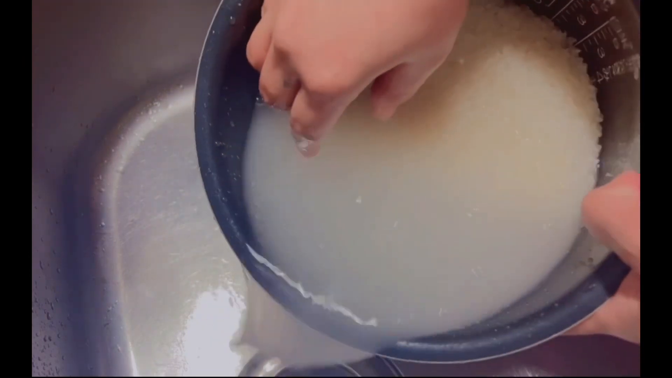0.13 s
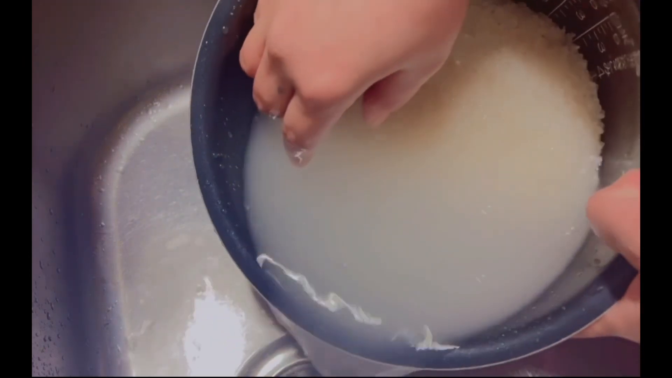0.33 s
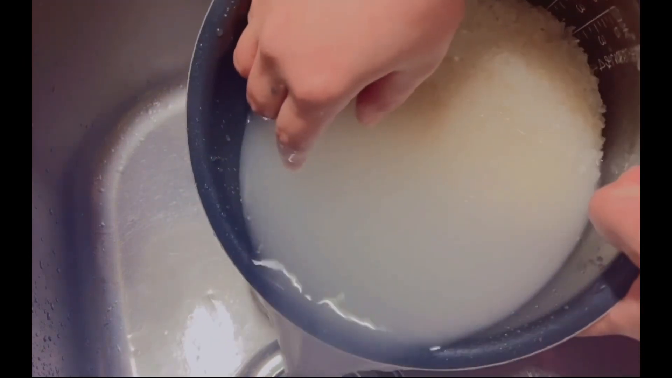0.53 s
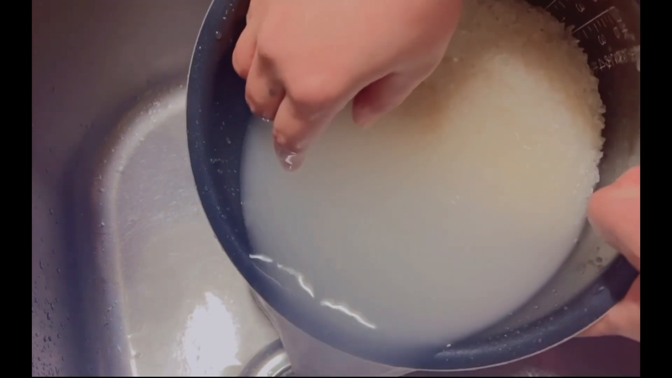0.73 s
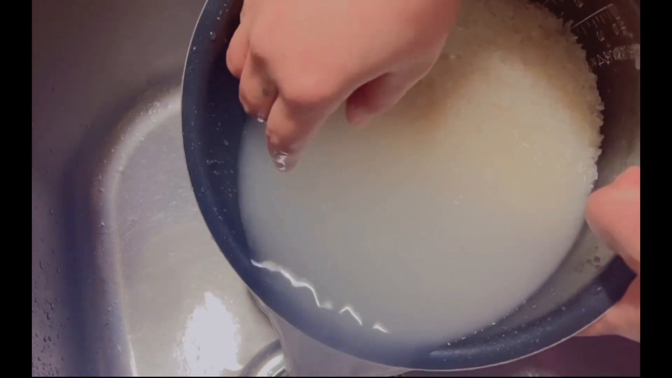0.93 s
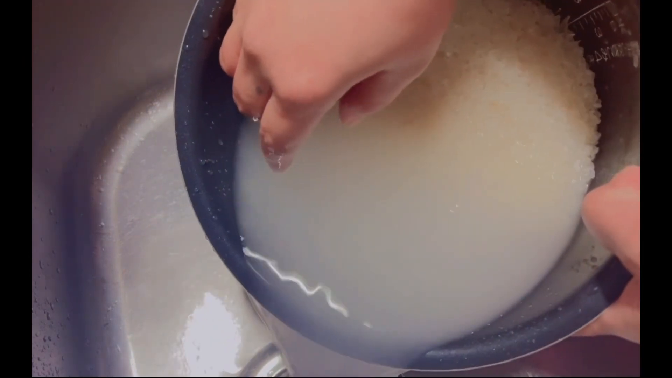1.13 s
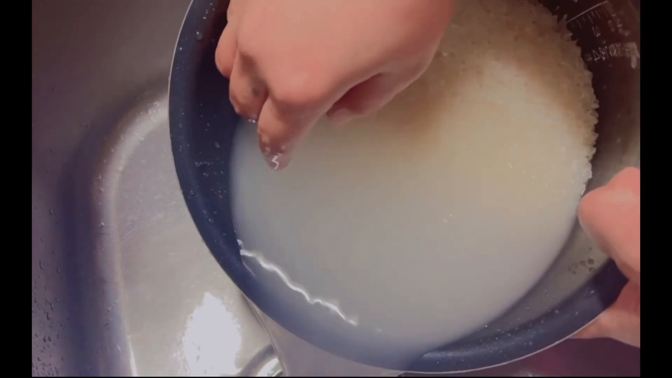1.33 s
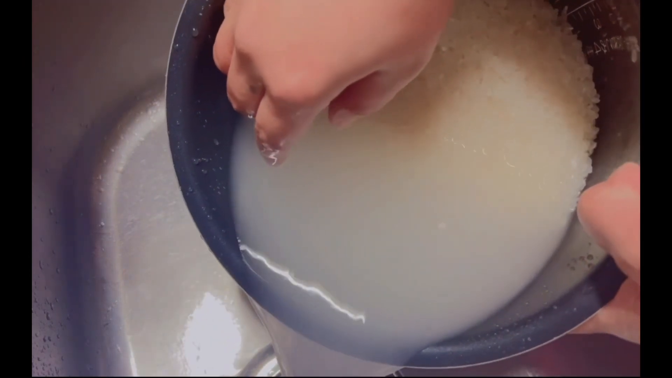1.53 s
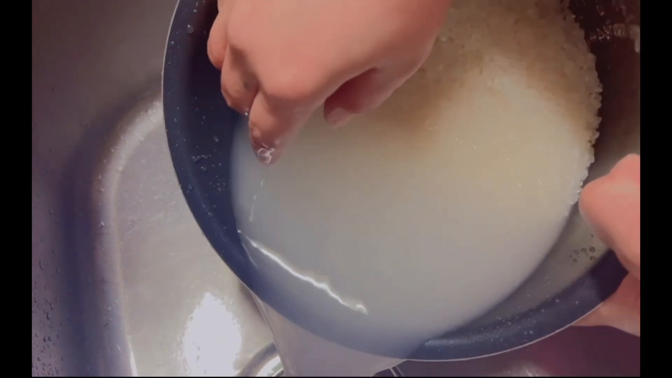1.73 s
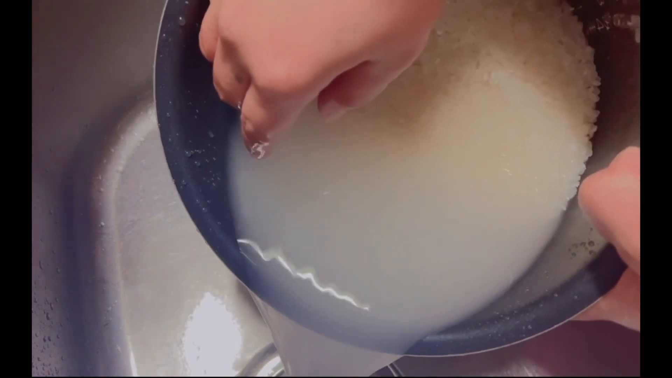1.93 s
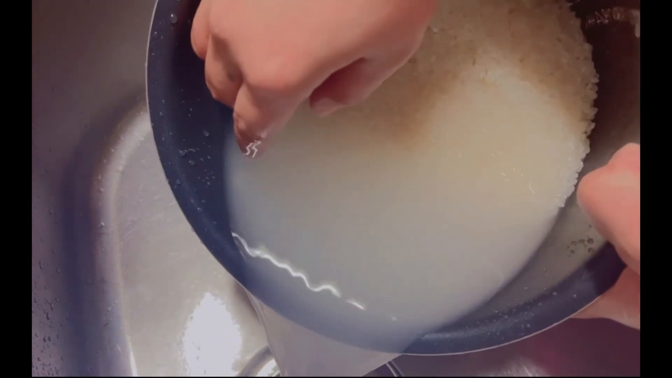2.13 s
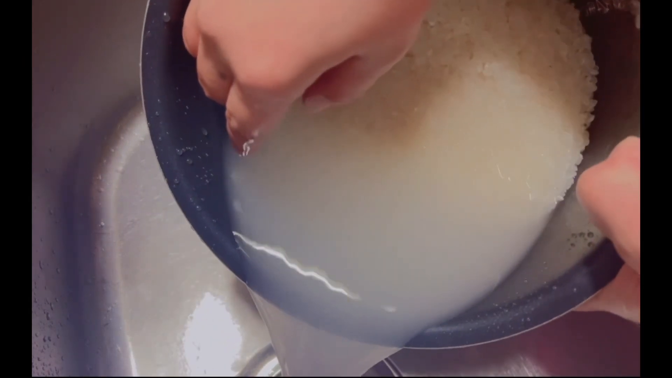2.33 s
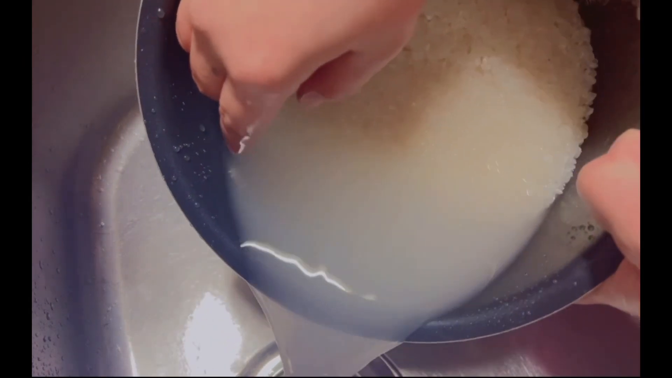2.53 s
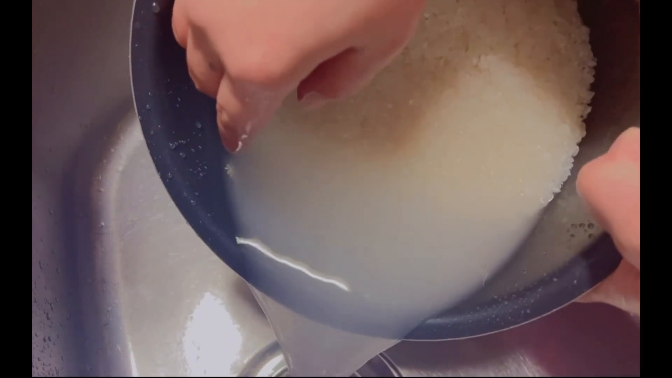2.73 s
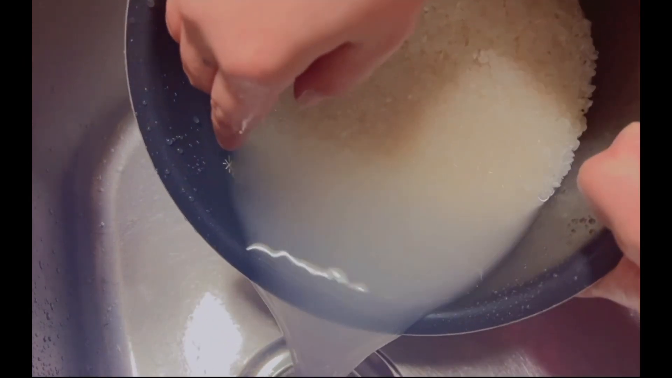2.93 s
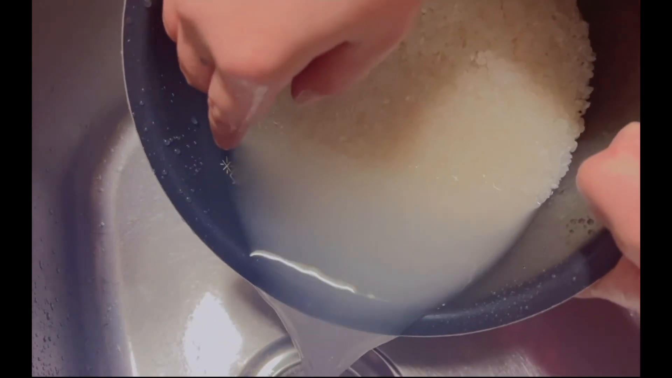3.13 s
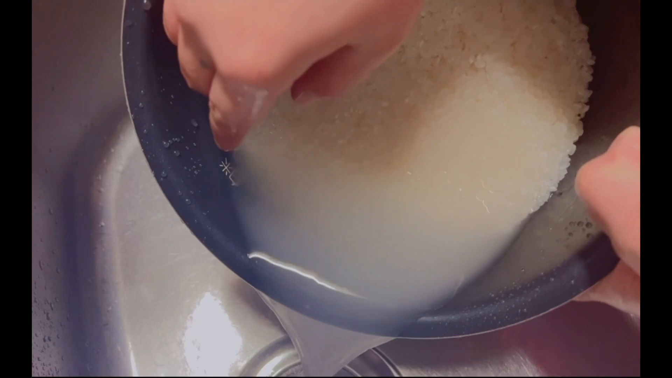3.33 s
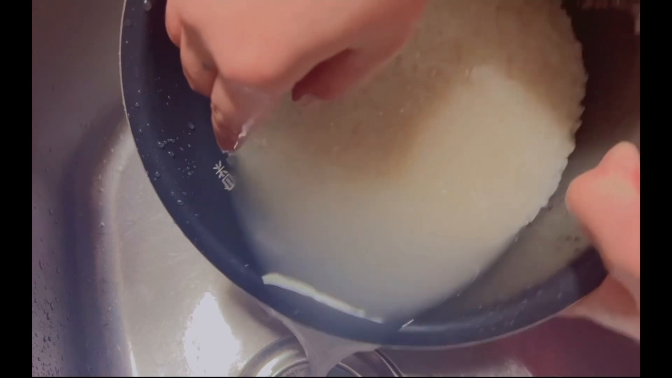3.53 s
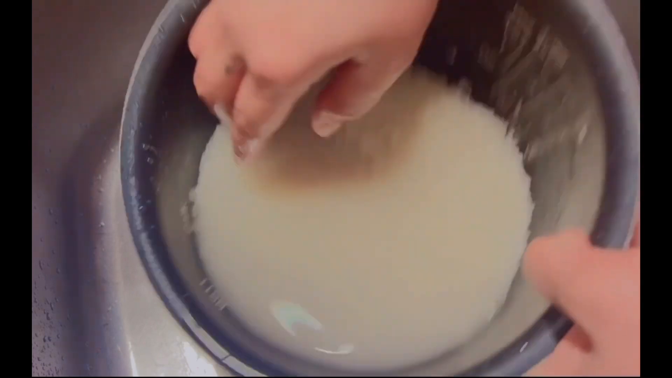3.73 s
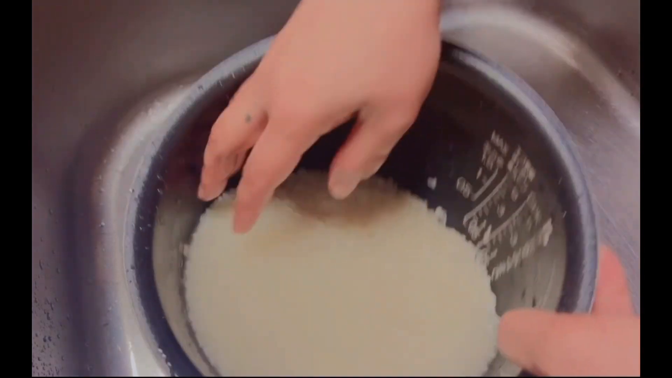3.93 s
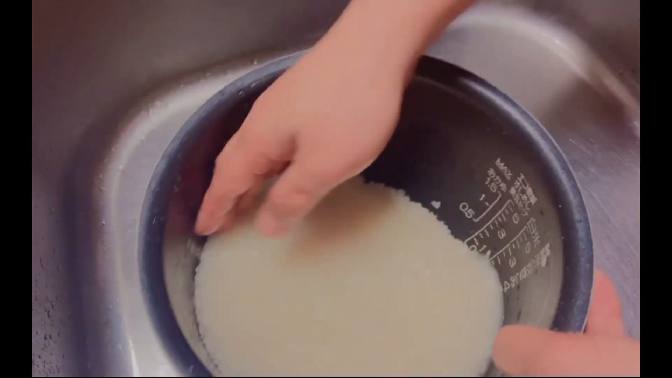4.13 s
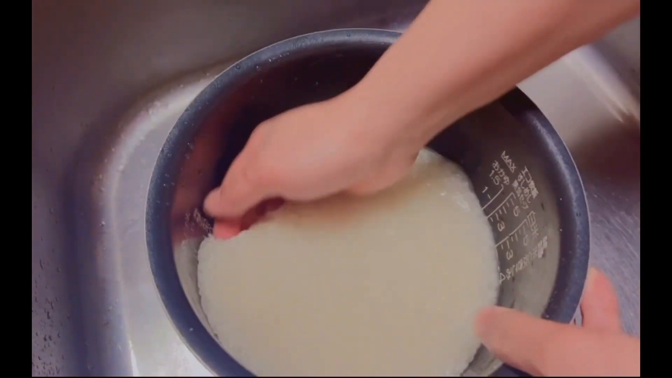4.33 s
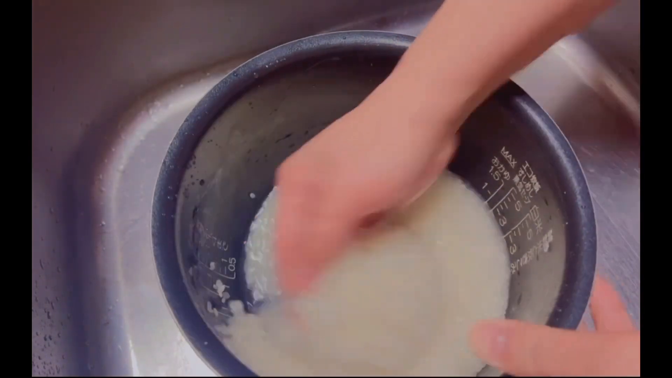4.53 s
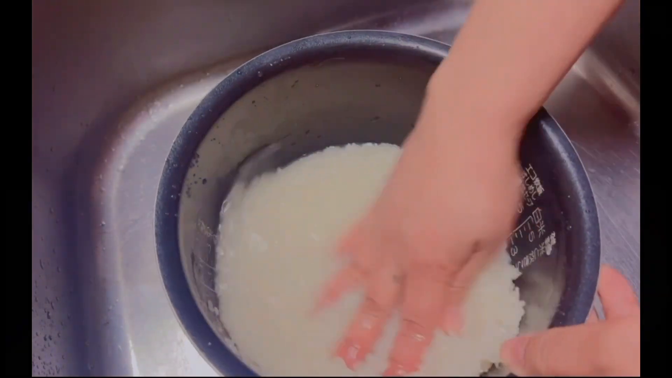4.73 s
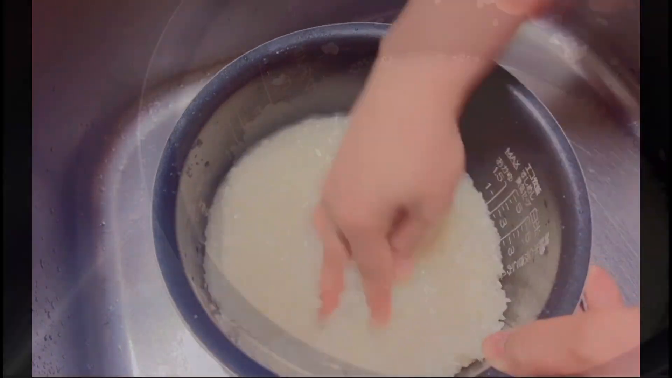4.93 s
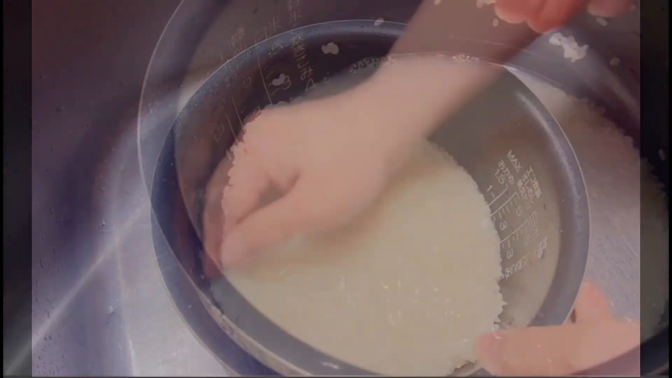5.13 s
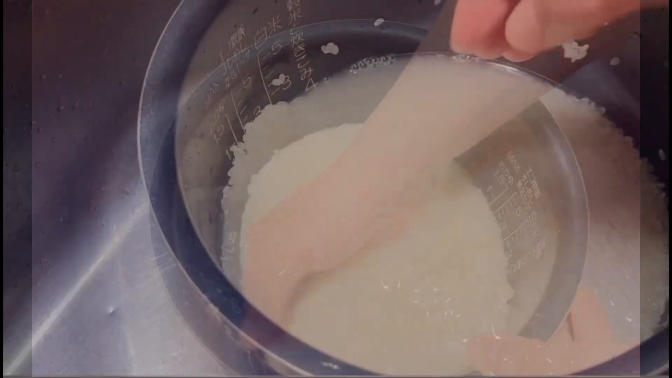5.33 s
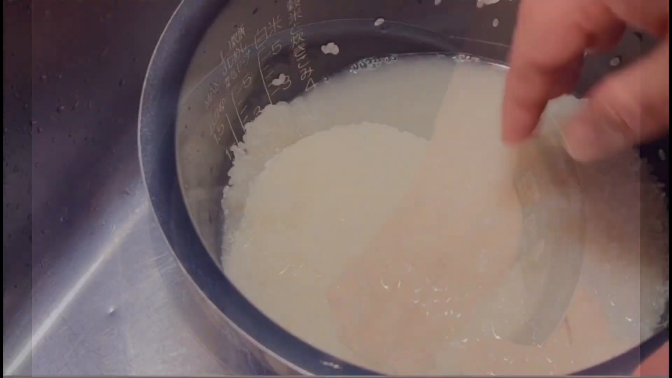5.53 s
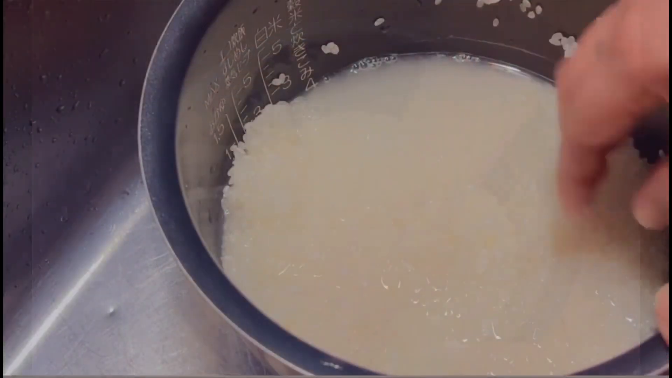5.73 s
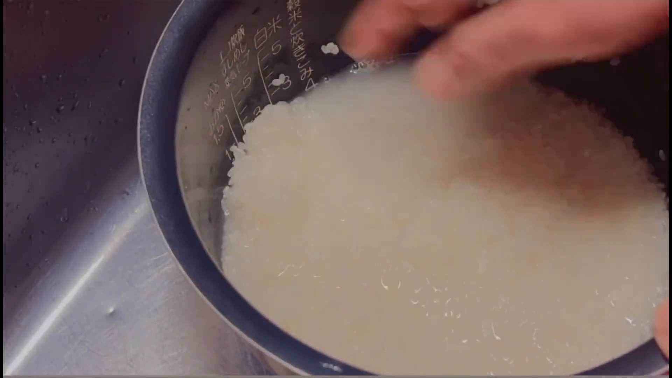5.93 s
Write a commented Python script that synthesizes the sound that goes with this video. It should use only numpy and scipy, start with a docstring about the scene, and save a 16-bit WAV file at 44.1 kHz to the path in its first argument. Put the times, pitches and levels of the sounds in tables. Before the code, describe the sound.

An uneven stream of water patters and glugs onto thin steel, full of bubbles and splashing droplets, for almost four seconds. A single heavy pot knock dominates, with a deep boom and short metallic chatter. Then soft wet grains rasp under quick hand strokes, the pot judders dully on the basin, and small clear taps follow. Close microphone, faint room echo.

```python
"""Pouring off rice water and stirring the rice

Cloudy rice water runs from a pot into a steel sink: random clicks strike basin tones for the drumming,
and short dying tones make the gurgles, bubbles and spatter. The pot lands with one heavy knock and rocks
to rest, as noise and struck steel tones. Then a hand stirs the wet rice, which rasps as filtered clicks
and bubbles, and fingers tap the pot. Close microphone, small kitchen with a faint echo."""
import sys
import numpy as np
from scipy import signal
from scipy.io import wavfile
from scipy.ndimage import uniform_filter1d

SR = 44100
rng = np.random.default_rng(int(sys.argv[2]) if len(sys.argv) > 2 else 0)


def materialize(psi):
    """Save the field psi as 16-bit PCM at rate SR to the path in sys.argv[1].

    A 1-D psi becomes a single channel; in a 2-D psi each row is a channel.
    """
    bounded = np.clip(np.atleast_2d(psi).T, -1, 1)
    quanta = np.round(bounded * 32767).astype(np.int16)
    wavfile.write(sys.argv[1], SR, quanta)


N = 268128
TIME = np.arange(N) / SR  # seconds

# slugs of water that land on the basin: start_s, level_db, pitch_hz (the strongest)
SLUGS = [(0.177, -43.5, 220.5), (0.421, -32.5, 171), (0.567, -26.5, 183), (0.626, -20, 117.6),
         (0.778, -25.5, 120), (1.008, -22.5, 137.5), (1.164, -26, 105.6), (1.223, -24.5, 113),
         (1.509, -20.5, 112.5), (1.608, -25.5, 117), (1.783, -16.5, 120.3), (1.86, -24, 200),
         (1.917, -25.5, 116), (2.126, -29, 153), (2.247, -21, 99.7), (2.342, -18.5, 115.3),
         (2.613, -23, 127.5), (2.774, -21, 120), (2.862, -24, 131), (3.078, -23.5, 98.5), (3.134, -27, 226),
         (3.19, -21, 115), (3.278, -18.5, 129.8), (3.572, -22, 121.2), (3.697, -27.5, 128)]
# tones of the struck basin, before any extra damping: pitch_hz, level_db, time_to_fall_60_db_s
SINK = [(64.6, -8, .16), (103, -11, .2), (128, 0, .185), (187, -10, .26), (229, -18, .32), (255, -24, .2),
        (367, -33, .3), (392, -32, .3), (495, -29, .3), (535, -32, .25), (578, -32, .3), (733, -35, .35),
        (893, -28, .4)]
DRUM_DB, DRUM_GROWTH = -40, 0.97  # level at a flow of 0 dB; dB per dB of flow
SWING_RISE_S, SWING_FALL_S = 0.0025, 0.046  # the basin floor under a slug


def drumming():
    """The stream patters on the sheet steel; slugs of water thump it and the floor swings a few times."""
    tap = ring(SINK, centre_hz=300, octaves=0.58, rise_s=0.0035)
    patter = unit(through(clicks(per_s=400, spread_db=3.5), tap))
    steady = amp(DRUM_DB) * stream() ** DRUM_GROWTH
    slug_patter = amp(-14.5) * surges(SLUGS, rise_s=0.0021, fall_s=0.048)
    out = np.hypot(steady, slug_patter) * patter
    t = TIME[:SR // 4]
    swing = (1 - np.exp(-(t / SWING_RISE_S) ** 2)) * np.exp(-t / SWING_FALL_S)
    for s, db, hz in SLUGS:
        add(out, s, peaked(swing * np.sin(2 * np.pi * hz * t), db - 6.0))
    return out


# the stream, as the pot is tipped and righted: time_s, flow_db
FLOW = [(0.171, -30), (0.181, -13.5), (0.33, -15), (0.39, -6), (0.53, -9.5), (0.57, -1.5), (0.72, -6.5),
        (1.04, 0), (1.2, -6), (1.36, -2.5), (1.7, 0.5), (2.2, -1.5), (2.57, 2), (2.9, -4.5), (3.27, -4.5),
        (3.45, -5.5), (3.55, -6), (3.86, -12.5), (3.93, -18.5), (4.0, -16.5)]
GATHER_S, GATHER_DB = 0.15, 0.5  # span and depth of the change before each slug


def stream():
    """Strength of the steady stream, which swells slightly while each slug gathers."""
    gathering = np.zeros(N)
    for s, _, _ in SLUGS:
        add(gathering, s - GATHER_S, np.sin(np.linspace(0, np.pi / 2, int(GATHER_S * SR))))
    smooth = uniform_filter1d(np.minimum(gathering, 1), size=300)
    return level(FLOW, 1) * amp(GATHER_DB * smooth)


# tone colour of the water: frequency_hz, level_db (per Hz)
WATER = [(250, 14), (295, -7.5), (372, 7.5), (432, -6), (485, 5), (590, -13), (735, -7), (890, -5.5),
         (1200, -16), (1650, -12), (2250, -15.5), (3300, -20), (6400, -22), (7200, -27), (8200, -24),
         (11500, -26.5), (15700, -19.5)]
# air resonances between basin and pot: pitch_hz, width_hz, height_db
BASIN_AIR = [(398, 20, 1.5), (497, 25, 2), (731, 20, 7), (759, 18, 5), (893, 25, 7), (985, 25, 3),
             (1071, 25, 5), (1130, 30, 3), (1215, 40, 5), (1355, 45, 5), (1612, 45, 7), (1735, 45, 4),
             (1880, 150, 3), (2380, 180, 4), (3750, 200, 3), (4140, 90, 6), (4520, 180, 5), (6680, 140, 6),
             (8000, 350, 3), (8950, 200, 4)]
# air churned under the stream, against the flow: time_s, level_db
CHURN = [(0.2, -9.5), (0.7, -11), (1.1, -6.5), (1.4, -1), (1.62, -5.5), (1.8, -4), (2.05, -2.5),
         (2.27, -4.5), (2.38, 0.5), (2.65, -6.5), (2.9, -5), (3.2, -4), (3.5, -4.5), (3.9, 6)]
# large pockets of trapped air: start_s, peak_db, pitch_hz (at the start), ring_s
GULPS = [(0.407, -34, 616, 0.013), (0.42, -28.5, 890, 0.0074), (0.436, -30.5, 734, 0.012),
         (0.57, -33.5, 670, 0.011), (0.583, -34, 860, 0.006), (0.777, -36, 480, 0.0087),
         (0.797, -38.5, 893, 0.0084), (1.012, -26, 484, 0.011), (1.157, -34, 360, 0.016),
         (1.159, -34, 893, 0.011), (1.205, -39, 910, 0.0068), (1.248, -39, 892, 0.018),
         (1.362, -37, 366, 0.021), (1.368, -41, 720, .009), (1.505, -37, 448, 0.013),
         (1.602, -38, 400, 0.008), (1.767, -27, 366, 0.011), (1.769, -29.5, 752, 0.014),
         (1.778, -44, 866, .007), (1.798, -35, 388, 0.016), (1.802, -36, 1070, 0.013),
         (1.83, -36, 887, 0.013), (1.95, -37, 904, 0.01), (2.012, -36, 750, .011),
         (2.013, -33, 503, 0.0097), (2.133, -37, 386, 0.0049), (2.343, -32, 714, 0.0089),
         (2.37, -42, 740, .012), (2.46, -32, 492, 0.008), (2.472, -31, 374, 0.011), (2.684, -34, 472, 0.01),
         (2.719, -29.5, 765, 0.0052), (2.809, -35.5, 875, 0.0081), (2.811, -24, 411, 0.006),
         (2.98, -32.5, 447, 0.0064), (3.183, -28, 414, 0.0041), (3.196, -35, 885, 0.016),
         (3.278, -31, 398, 0.0024), (3.33, -40, 910, 0.0087), (3.358, -28.5, 528, 0.017),
         (3.378, -41, 785, 0.0062), (3.382, -27.5, 377, 0.01), (3.69, -34, 370, 0.0036)]
GURGLE_DB, GURGLE_GROWTH = -41.5, 1.0  # level at flow and churn of 0 dB; dB per dB of flow


def gurgle():
    """Air churned under the stream rings in the basin; every gulp breaks up into a cloud of large bubbles."""
    swarm = scattered(lambda: froth(260.6, 1446, cycles=2.7, spread_db=2.5, count=2000),
                      t60=0.12, wall_db=-3, count=2)
    swarm = unit(colour(hollow(swarm, BASIN_AIR), WATER))
    steady = amp(GURGLE_DB) * level(CHURN, 1) * stream() ** GURGLE_GROWTH
    cloud = scattered(lambda: froth(246.7, 930, cycles=5.1, spread_db=1.0, count=1200),
                      t60=0.07, wall_db=-2, count=1)
    cloud = unit(band(hollow(cloud, BASIN_AIR), 250, 1200, order=4))
    churned = steady * lumps(top_hz=13.2, depth_db=1.5) * swarm
    return churned + amp(-14.0) * surges(GULPS, rise_s=0.0023, fall_s=0.022) * cloud


BURBLE_DB = -43  # at flow and churn of 0 dB


def burble():
    """Middling bubbles crowd the pool under the stream and plop one over another."""
    plops = scattered(lambda: froth(620, 2300, cycles=6, spread_db=2.6, count=700),
                      t60=.07, wall_db=-6, count=2)
    plops = unit(colour(hollow(plops, BASIN_AIR), WATER))
    return amp(BURBLE_DB) * level(CHURN, 1) * level(FLOW, 1) * plops


SPATTER_DB = -44  # strength of the hiss at a flow of 0 dB


def spatter():
    """Bursting bubbles, tiny fizz and droplet ticks come in clumps as the stream breaks up."""
    clumps = lumps(top_hz=45, depth_db=2.4)
    pops = scattered(lambda: clumps * froth(1357, 2790, cycles=5.5, spread_db=3.5, count=400),
                     t60=0.06, wall_db=-4, count=2)
    fizz = scattered(lambda: clumps * froth(2317, 12500, cycles=11, spread_db=3.4, count=2800),
                     t60=0.055, wall_db=1, count=2)
    ticks = scattered(lambda: clumps * clicks(per_s=1800, spread_db=3.4), t60=.05, wall_db=2, count=2)
    ticks = unit(band(ticks, 2720, 17000, order=1))
    wet = colour(hollow(fizz + amp(-17.0) * pops + amp(-0.5) * ticks, BASIN_AIR), WATER)
    return amp(SPATTER_DB) * level(FLOW, 1) * wet / treble_rms(wet)


# bursts of fine spray as a lump of water or rice breaks on the steel: start_s, level_db
SPRAYS = [(0.175, -43), (0.185, -38), (0.393, -32), (0.553, -28), (0.572, -31), (0.622, -32), (0.742, -37),
          (0.933, -28), (1.5475, -39), (1.7086, -24), (1.9735, -25), (2.123, -23), (2.311, -28),
          (2.4834, -23.5), (2.546, -34), (2.638, -26.5), (2.686, -28), (3.199, -38), (3.233, -26),
          (3.272, -32), (3.407, -28.5), (3.4562, -32)]
SPRAY_RISE_S, SPRAY_FALL_S, SPRAY_DB = .001, .008, -9  # SPRAY_DB is added to every burst


def spray():
    """Each burst is a short puff of very many tiny droplets."""
    droplets = band(clicks(per_s=12000, spread_db=1.0), 5000, 15000, order=1)
    mist = unit(colour(droplets, WATER))
    return amp(SPRAY_DB) * surges(SPRAYS, SPRAY_RISE_S, SPRAY_FALL_S) * mist


# small ringing bubbles: start_s, peak_db, pitch_hz, reflections_db (against the ping)
PLIPS = [(0.303, -45, 1940, -10), (0.337, -45, 3100, 1), (0.375, -33.5, 8850, 9), (0.4, -39, 7700, 1),
         (0.4229, -17, 1800, -7), (0.469, -33.5, 2620, 2), (0.51, -38.5, 6850, 3), (0.553, -40, 4220, 4),
         (0.569, -34, 10300, 2), (0.599, -29.5, 1800, -3), (0.601, -36, 8060, 2), (0.708, -37.5, 4130, -5),
         (0.743, -34.5, 10060, 5), (0.754, -34, 1870, 4), (0.781, -35, 2770, -1), (0.822, -32.5, 6040, 7),
         (0.849, -33.5, 1770, 1), (0.919, -38, 2770, -2), (0.926, -36, 1930, -9), (0.983, -36, 2350, 2),
         (1.013, -34, 1030, 0), (1.061, -34.5, 2170, -4), (1.265, -34.5, 6460, 8), (1.268, -32, 1740, 7),
         (1.343, -32.5, 3160, 7), (1.344, -30.5, 1780, 7), (1.382, -35, 3150, -2), (1.435, -36, 2460, -5),
         (1.5224, -28, 1950, -4), (1.549, -34, 2590, -3), (1.644, -33, 4670, 8), (1.695, -38, 4480, -2),
         (1.727, -33, 1820, -5), (1.735, -33, 6630, 0), (1.778, -31, 2100, 4), (1.803, -33, 1360, 1),
         (1.83, -38, 6590, -2), (1.8831, -26, 1800, -0.5), (1.9895, -27, 2000, -4), (2.008, -25, 1980, -1),
         (2.075, -39, 4520, 5), (2.135, -31.5, 1870, 5), (2.141, -34.5, 7590, 6), (2.297, -27, 1960, -2),
         (2.319, -27, 6200, -10), (2.34, -28, 1610, -4), (2.4, -43, 6570, -8), (2.413, -36.5, 3400, 2),
         (2.546, -25.5, 1700, 1), (2.547, -29, 4900, 5), (2.551, -33, 2480, 3), (2.568, -30.5, 6400, 4),
         (2.593, -28.5, 4050, 5), (2.719, -20, 1640, 0), (2.721, -30, 4770, 0), (2.778, -38, 3740, -12),
         (2.9356, -27.5, 1910, -9), (3.006, -31.5, 3390, 6), (3.111, -37, 1520, -6), (3.125, -33, 4900, 2),
         (3.1987, -31, 8450, 4), (3.24, -29, 1850, -3), (3.242, -39, 6510, 0), (3.411, -36, 8600, 5),
         (3.44, -40, 4530, -9), (3.463, -44, 1760, -4), (3.578, -36, 910, -3), (3.602, -39, 1730, 0),
         (3.631, -38.5, 940, -9), (3.68, -38, 4080, 10), (3.687, -32.5, 890, -6), (3.752, -46, 930, -5)]
PLIP_CYCLES, PLIP_CYCLES_PER_OCTAVE = 3.22, 1.64  # small bubbles swing more often
GULP_RISE_S, GULP_GLIDE_PER_S = 0.0038, 0.72  # a gulp swells, and its pitch creeps up near the surface


def big_bubbles():
    """Single gulps and plips ring out of the swarm, each on a pitch of its own."""
    out, t = np.zeros(N), TIME[:SR // 7]
    for s, db, hz, ring_s in GULPS:
        swell = (1 - np.exp(-(t / GULP_RISE_S) ** 2)) * np.exp(-t / ring_s)
        gulp = swell * np.sin(2 * np.pi * hz * t * (1 + GULP_GLIDE_PER_S * t))
        add(out, s, peaked(through(gulp, basin(t60=.16, wall_db=-7)), db))
    for s, db, hz, wall_db in PLIPS:
        cycles = PLIP_CYCLES + PLIP_CYCLES_PER_OCTAVE * max(np.log2(hz / 1800), 0)
        plip = splash(hz, cycles, glide=0.0036, t60=0.1, wall_db=wall_db)
        add(out, s, peaked(hollow(plip, BASIN_AIR), db))
    return out


# the pot lands on the basin and rocks: start_s, crack_db, boom_db, rattle_db, pot_ring_db
KNOCKS = [(4.005, -19.5, -0.5, -29, -36), (4.112, -36.5, -26, -33, -43), (4.195, -57, -22, -55, -66)]
# tone colour of the crack: frequency_hz, level_db (per Hz)
CRACK = [(200, -4), (380, -14.5), (880, -14), (1100, -0.5), (1650, -6.5), (2100, -14.5), (3050, -6.5),
         (4400, -7.5), (5400, -9.5), (6600, -7.5), (10000, -14), (15700, -26)]
# the steel rings briefly under the contact: pitch_hz, width_hz, height_db
CONTACT_PEAKS = [(550, 80, 6), (890, 60, 4), (1610, 90, 5), (3110, 130, 7), (4460, 150, 5)]
# tones of the struck pot, before any extra damping: pitch_hz, level_db, time_to_fall_60_db_s
POT = [(700, -8, .4), (1040, -3, .42), (1130, -9, .2), (1182, -8, .2), (1228, -5, .24), (1615, -12, .2),
       (1855, -4, .21), (1925, -14, .15), (2450, -10, .15), (2681, -2, .12), (3359, 0, .12),
       (3828, -22, .15), (4549, 0, .1), (5245, -7, .16), (6051, -4, .1), (6690, -8, .1), (7950, -9, .12)]


def knocks():
    """A gritty crack at the contact; the basin floor sags under the weight, booms and rattles."""
    out, t = np.zeros(N), TIME[:SR * 2 // 5]
    for s, crack_db, boom_db, rattle_db, ring_db in KNOCKS:
        contact = np.exp(-(t / 0.0098) ** 4) + amp(3) * np.exp(-t / 0.023)
        contact = contact * (1 - np.exp(-t / .0008))
        crack = unit(hollow(colour(rng.standard_normal(len(t)), CRACK), CONTACT_PEAKS))
        rattle = hollow(band(rng.standard_normal(len(t)), 290, 855, order=3), BASIN_AIR)
        rattle = rattle * amp(-60 * t / 0.42)
        sag = np.sin(2 * np.pi * 80 * t) * np.exp(-t / 0.013) * (1 - np.exp(-t / 0.015))
        pot_ring = ring(POT, centre_hz=1280, octaves=0.28, rise_s=0.00198)
        pot_ring = pot_ring * np.exp(-t / 0.093)  # damped by the basin
        boom = ring(SINK, centre_hz=120, octaves=1.54, rise_s=0.011)
        add(out, s, crack * peaked(contact, crack_db))
        add(out, s, peaked(pot_ring, ring_db))
        add(out, s + 0.00061, peaked(boom, boom_db))
        add(out, s + 0.0079, peaked(sag, boom_db - 13))
        add(out, s + 0.00464, peaked(rattle, rattle_db))
    return out


# tones of the basin's side panels, before any extra damping: pitch_hz, level_db, time_to_fall_60_db_s
PANELS = [(381, -7, .35), (493, -4, .35), (530, -5, .35), (577, -1, .33), (698, -6, .3), (735, -3, .32),
          (796, -6, .25), (895, 1, .22), (1061, -9, .25), (1133, -7, .25), (1357, -7, .17), (1620, -6, .18)]
# the pot's foot chatters on the steel as it rocks: start_s, peak_db
CHATTER = [(4.006, -20), (4.029, -25.5), (4.058, -28), (4.113, -27.5), (4.143, -39), (4.175, -38.5),
           (4.195, -40.5), (4.245, -51)]


def chatter():
    """Each touch of the rocking pot scrapes briefly on the steel and rings the panels, which its weight damps."""
    out, t = np.zeros(N), TIME[:SR * 2 // 5]
    panels = ring(PANELS, centre_hz=750, octaves=1.3, rise_s=.001) * np.exp(-t / .035)
    for s, db in CHATTER:
        scrape = rng.standard_normal(len(t)) * np.exp(-t / .008)
        grit = band(scrape, 450, 1500)
        add(out, s, peaked(unit(through(scrape, panels)) + amp(-3.5) * unit(grit), db))
    return out


# the hand bumps the bottom of the loaded pot: start_s, knock_db, thud_db
BUMPS = [(5.0457, -36, -41)]
# tones of the pot bottom, damped by the rice: pitch_hz, level_db, time_to_fall_60_db_s
POT_BOTTOM = [(366, -7, 0.18), (503, -17, 0.13), (707, -9, .07), (1066, -0.5, .05), (1220, -13, .035)]
THUD_DELAY_S = .005  # the basin answers a moment later


def bumps():
    """A short, hollow knock on the pot bottom, then a soft thud from the basin beneath."""
    out = np.zeros(N)
    knock = ring(POT_BOTTOM, centre_hz=900, octaves=2.3, rise_s=0.002)
    thud = ring(SINK, centre_hz=130, octaves=0.92, rise_s=0.0029) * np.exp(-TIME[:len(knock)] / .02)
    for s, knock_db, thud_db in BUMPS:
        add(out, s, peaked(knock, knock_db))
        add(out, s + THUD_DELAY_S, peaked(thud, thud_db))
    return out


# tone colour of the wet rice: frequency_hz, level_db (per Hz)
RICE = [(200, -11.5), (380, -15), (700, -7), (1000, -12.5), (1550, -10.5), (2200, -6), (3100, -4.5),
        (4300, -2.5), (6500, -4), (7500, -5.5), (10000, -10.5), (15700, -10)]
# air resonances inside the pot: pitch_hz, width_hz, height_db
POT_AIR = [(700, 70, 4), (1050, 50, 6), (1220, 90, 7), (1860, 60, 8), (2450, 110, 6), (2610, 120, 6),
           (5240, 80, 5), (6500, 400, 2), (8000, 100, 4), (9100, 250, 3)]
# fingers crunch through packed rice: start_s, peak_db, pitch_hz
CRUNCHES = [(4.536, -43, 3280), (4.592, -36.5, 4500), (4.631, -31, 6670), (4.653, -29.5, 5200),
            (4.685, -44, 3760), (4.716, -27, 5030), (4.738, -40, 2500), (4.755, -40, 5300),
            (4.778, -39, 540), (4.853, -43, 6200), (4.906, -36, 5400), (4.923, -38, 4070),
            (4.927, -36, 5000), (4.962, -39, 4500), (5.058, -40, 3960), (5.057, -36.5, 7500),
            (5.059, -40.5, 10500), (5.071, -37, 5600), (5.087, -40, 6100), (5.098, -40, 2570),
            (5.109, -29.5, 5340), (5.171, -36, 8400), (5.865, -52, 2950), (5.895, -43.5, 3090),
            (6.036, -37, 8050)]
SEEP_DB = -63  # a faint floor of motion, from the first knock on


def stirring():
    """Wet grains catch and slip on each other and the wall; at rest, water still seeps between them."""
    slips = lumps(top_hz=90, depth_db=1.1)
    grains = scattered(lambda: slips * clicks(per_s=700, spread_db=3.6), t60=0.04, wall_db=1, count=3)
    squelch = scattered(lambda: slips * froth(700, 12000, cycles=7, spread_db=3, count=4000),
                        t60=.06, wall_db=1, count=2)
    rasp = colour(hollow(grains + amp(-3.5) * squelch, POT_AIR), RICE)
    motion = np.hypot(hand_speed(), amp(SEEP_DB) * (TIME > KNOCKS[0][0]))
    out = amp(-1.54) * motion * rasp / treble_rms(rasp)
    for s, db, hz in CRUNCHES:
        add(out, s, peaked(splash(hz, cycles=3.7, glide=0, t60=0.1, wall_db=5), db))
    return out


# strokes of the hand through the rice: fastest_s, speed_db, build_up_s, release_s
STROKES = [(4.491, -48.5, 0.12, 0.19), (4.651, -38.5, 0.034, 0.21), (4.72, -33.5, 0.064, 0.062),
           (4.925, -51.5, 0.027, 0.13), (5.106, -48, 0.027, 0.14), (5.3, -54, 0.33, 1),
           (5.605, -44, 0.094, 0.06), (5.78, -65, 0.018, 0.012), (5.915, -51, 0.013, 0.061),
           (6.05, -50, 0.093, 0.1)]
DRAG_FROM_S, DRAG_TO_S, DRAG_DB = 3.4, 4.98, -60.5  # a slow drag keeps the grains moving


def hand_speed():
    """Each stroke gathers speed and slackens, over a slow steady drag."""
    drag = gesture(DRAG_FROM_S, DRAG_TO_S - DRAG_FROM_S, rise_s=0.01, fall_s=0.012)
    power = (amp(DRAG_DB) * drag) ** 2
    for s, db, build_s, release_s in STROKES:
        away = np.minimum(np.maximum((s - TIME) / build_s, (TIME - s) / release_s), 20)
        power = power + (amp(db) * np.exp(-away)) ** 2
    return np.sqrt(power)


SQUELCH_DB = -11  # against the hand speed


def squelching():
    """At speed the hand squeezes water and air through the rice: a coarse, low squelch under the rasp."""
    pockets = scattered(lambda: froth(450, 1700, cycles=4, spread_db=3, count=1800),
                        t60=.06, wall_db=-2, count=2)
    return amp(SQUELCH_DB) * hand_speed() * unit(hollow(pockets, POT_AIR))


# the wet hand rubs the pot wall into faint ringing: start_s, level_db, held_s, centre_hz
RUBS = [(3.825, -51.5, 0.05, 1560), (3.835, -53, 0.05, 755), (4.33, -56, 0.099, 1020),
        (4.57, -55, 0.055, 2060), (4.65, -48, 0.094, 1900), (4.715, -46.5, 0.082, 1250),
        (5.55, -54, 0.044, 1430), (5.712, -61, 0.1, 1600)]


def rubbing():
    """Skin sticks and slips on the wall: random clicks ring the pot around one pitch for each rub."""
    out = np.zeros(N)
    for s, db, held_s, hz in RUBS:
        wall = ring(POT, hz, octaves=0.59, rise_s=0.00046)
        ringing = unit(through(clicks(per_s=500, spread_db=1.5), wall))
        out += ringing * amp(db) * gesture(s, held_s, rise_s=0.011, fall_s=0.014)
    return out


# the hand shoves the pot against the basin: start_s, push_db, held_s
SHOVES = [(3.9, -74, 0.2), (4.635, -40.5, 0.14), (4.765, -34.5, 0.079), (4.897, -27.5, 0.011),
          (5.045, -44.5, 0.044), (5.2, -47.5, 0.051), (5.37, -45, 0.012), (5.553, -48, 0.11),
          (5.974, -40.5, 0.021)]
SHOVE_RISE_S, SHOVE_FALL_S = 0.025, 0.032
SETTLE_DB, SETTLE_S = -22, 0.15  # the loaded basin shudders on after the first knock


def shoving():
    """The pot judders on the basin floor as it settles and whenever the hand pushes it."""
    judder = ring(SINK, centre_hz=95, octaves=.8, rise_s=.008)
    shove = unit(through(clicks(per_s=220, spread_db=2.2), judder))
    rumble = unit(band(rng.standard_normal(N), 76, 143.0))
    push = sum(amp(db) * gesture(s, held_s, SHOVE_RISE_S, SHOVE_FALL_S) for s, db, held_s in SHOVES)
    settle = amp(SETTLE_DB) * gesture(KNOCKS[0][0], 0, SHOVE_RISE_S, SETTLE_S)
    return (push + settle) * (amp(-8) * shove + amp(-0.5) * rumble)


# fingers tap the pot: start_s, peak_db, blow_centre_hz, click_share (a plain factor), click_centre_hz
TAPS = [(4.303, -47.5, 1920, 0.3, 1900), (4.318, -41, 1010, 1.8, 1020), (5.71, -53, 1850, .3, 3000),
        (5.716, -53.5, 1000, .1, 785), (5.768, -45, 3900, 0.2, 4500), (5.975, -26, 3000, 0.38, 6000),
        (6.035, -33, 7960, 2.7, 8240)]


def taps():
    """A short scuff of skin sounds together with the clean ring of the pot wall."""
    out, t = np.zeros(N), TIME[:SR * 2 // 5]
    for s, db, hz, share, click_hz in TAPS:
        click = band(rng.standard_normal(len(t)), click_hz / 1.44, click_hz * 1.6, order=2)
        click = click * np.exp(-t / 0.008)
        wall = ring(POT, hz, octaves=0.21, rise_s=0.0022)
        add(out, s, peaked(peaked(wall, 0) + share * peaked(click, 0), db))
    return out


# how long the kitchen echoes: frequency_hz, time_to_fall_60_db_s
KITCHEN = [(100, 0.83), (600, 0.92), (1200, 0.21), (3000, 0.12), (14000, 0.14)]


def kitchen(x):
    """A diffuse echo of fading noise, in which the treble dies sooner than the bass."""
    noise = rng.standard_normal(SR) * (TIME[:SR] > .012)
    hz, t, z = signal.stft(noise, SR, nperseg=256)
    tail = signal.istft(z * amp(-60 * t / read(KITCHEN, hz)[:, None]), SR, nperseg=256)[1]
    return through(x, tail / np.linalg.norm(tail))


# thin, very high, faint gliding tones, one list of points for each: time_s, pitch_hz, level_db
HIGH_TONES = [
    [(5.68, 15100, -73), (5.72, 15500, -64), (5.75, 15800, -74)],
    [(5.72, 11900, -72), (5.77, 12950, -63), (5.83, 12150, -70)],
    [(5.84, 12100, -69), (5.885, 12900, -66), (5.925, 14000, -67), (6.01, 12200, -72)],
    [(5.885, 15050, -64), (5.905, 15600, -58), (5.93, 15800, -58), (5.97, 14900, -64), (5.995, 14600, -70)],
]


def high_tones():
    """Thin, very high, faint tones glide up and down."""
    out = np.zeros(N)
    for rows in HIGH_TONES:
        s, hz, _ = np.transpose(rows)
        pitch = uniform_filter1d(np.interp(TIME, s, hz), size=1500)
        out += level(rows, 2) * np.sin(2 * np.pi * np.cumsum(pitch) / SR)
    return out


# tone colour of the quiet background: frequency_hz, level_db (per Hz)
QUIET = [(24, -52), (40, -8), (117, 1), (203, -12.5), (281, -15.5), (419, -19.5), (1320, -35.5),
         (1880, -32.5), (3090, -43), (15700, -33.5)]
QUIET_DB = -57


def quiet_air():
    """Steady, faint noise, strongest in the bass."""
    return amp(QUIET_DB) * unit(colour(rng.standard_normal(N), QUIET))


def amp(db):
    """Turns decibels into a plain gain."""
    return np.exp(np.asarray(db) * (np.log(10) / 20))


def unit(x):
    """Scales to rms 1."""
    return x / np.sqrt(np.mean(x ** 2) + 1e-20)


def peaked(x, db):
    """Scales to a peak level."""
    return amp(db) * x / (abs(x).max() + 1e-20)


def treble_rms(x):
    """Strength of the hiss in a sound."""
    return band(x, 2300, 15000).std()


def read(points, hz):
    """Reads a spectrum on a log-frequency axis."""
    f, value = np.transpose(points)
    return np.interp(np.log(hz + 1), np.log(f), value)


def level(table, column):
    """Gain curve of one column, fading quickly outside its span."""
    rows = np.array(table)
    outside = np.maximum(rows[0, 0] - TIME, 0) + np.maximum(TIME - rows[-1, 0], 0)
    return amp(np.interp(TIME, rows[:, 0], rows[:, column])) * np.exp(-outside / 0.014)


def add(mix, s, sound):
    """Mixes a sound in at a given second."""
    part = mix[max(round(s * SR), 0):][:len(sound)]
    part += sound[:len(part)]


def through(x, response):
    """Lets every sample of a sound set off the response."""
    return signal.oaconvolve(x, response)[:len(x)]


def band(x, lo_hz, hi_hz, order=2):
    """Keeps the frequencies between two limits."""
    limits = [lo_hz, min(hi_hz, SR / 2 - 100)]
    return signal.sosfilt(signal.butter(order, limits, "band", fs=SR, output="sos"), x)


def colour(x, points, size=2048):
    """Causal filter with the given spectrum."""
    hz = abs(np.fft.fftfreq(size, 1 / SR))
    log_gain = np.log(amp(np.maximum(read(points, hz), -90)))
    # this phase puts the filter's energy as early as possible
    return through(x, np.fft.ifft(np.exp(np.conj(signal.hilbert(log_gain)))).real)


def hollow(x, resonances):
    """Each resonance lifts a narrow band."""
    lifts = [(amp(db) - 1) * signal.lfilter(*signal.iirpeak(hz, hz / width, fs=SR), x)
             for hz, width, db in resonances]
    return x + sum(lifts)


def ring(modes, centre_hz, octaves, rise_s):
    """Tones struck by a blow that favours the region around centre_hz."""
    t = TIME[:SR * 2 // 5]
    hz, db, t60 = np.transpose(modes)[:, :, None]
    weight = 1 / (1 + (np.log2(hz / centre_hz) / octaves) ** 2)
    tones = weight * amp(db - 60 * t / t60) * np.sin(2 * np.pi * hz * t)
    return tones.sum(0) * (1 - np.exp(-(t / rise_s) ** 2))


def basin(t60, wall_db):
    """Direct sound, then reflections that build up between the steel walls and die away."""
    t = TIME[:SR // 11]
    echoes = rng.standard_normal(len(t)) * amp(-60 * t / t60) * (1 - np.exp(-t / 0.0039))
    return (t == 0) + amp(wall_db) * echoes / np.linalg.norm(echoes)


def scattered(source, t60, wall_db, count):
    """Sources at several places in the basin, each with reflections of its own."""
    return unit(sum(through(source(), basin(t60, wall_db)) for _ in range(count)))


def clicks(per_s, spread_db):
    """Random impacts of uneven size."""
    out, hit = np.zeros(N), np.flatnonzero(rng.random(N) < per_s / SR)
    chance, sign = rng.random((len(hit), 2)).T
    out[hit] = np.sign(sign - .5) * amp(-spread_db * np.log(np.maximum(chance, .02)))
    return out


def bubble(hz, cycles, glide):
    """A dying tone; a glide above zero lets it rise, as when a bubble nears the surface."""
    u = np.arange(int(6 * cycles * SR / hz) + 2) * hz / (cycles * SR)  # time in decay times
    tone = np.sin(2 * np.pi * cycles * (u + glide * u * u / 2))
    return tone * np.exp(-u) * (1 - np.exp(-4 * u))


def splash(hz, cycles, glide, t60, wall_db):
    """One short ping, with a wash of reflections around the same pitch."""
    t = TIME[:SR // 8]
    tone = np.zeros(len(t))
    add(tone, 0, bubble(hz, cycles, glide))
    wash = rng.standard_normal(len(t)) * amp(-60 * t / t60) * (t > .002)
    echoes = through(wash, bubble(hz, cycles * 0.39, glide))
    return unit(tone) + amp(wall_db) * unit(echoes)


def froth(lo_hz, hi_hz, cycles, spread_db, count):
    """A swarm of bubbles of many sizes, with roughly equal energy per hertz."""
    out, sizes = np.zeros(N), rng.random((count // 8, 2))
    place = (np.arange(len(sizes)) + sizes[:, 0]) / len(sizes)
    pitches = lo_hz * (hi_hz / lo_hz) ** place
    shapes = [hz * bubble(hz, cycles * (.5 + damping), 0.0072) for hz, damping in zip(pitches, sizes[:, 1])]
    when, chance = rng.random((count, 2)).T
    strength = amp(-spread_db * np.log(np.maximum(chance, .02)))
    for k, s in enumerate((when * TIME[-1]).tolist()):
        add(out, s, strength[k] * shapes[k % len(shapes)])
    return unit(out)


def lumps(top_hz, depth_db):
    """Uneven gain that swells and sinks at random, at rates up to about top_hz."""
    return amp(depth_db * unit(band(rng.standard_normal(N), 0.75, top_hz)))


def gesture(s, held_s, rise_s, fall_s):
    """Gain curve of attack, hold and release."""
    t = np.maximum(TIME - s, 0)
    return (1 - np.exp(-t / rise_s)) * np.exp(-np.clip((t - held_s) / fall_s, 0, 20))


def surges(events, rise_s, fall_s):
    """Each event stirs up the water in proportion to its strength, and the water calms again."""
    out, t = np.zeros(N), TIME[:SR // 2]
    for s, db, *_ in events:
        add(out, s, amp(db) * (1 - np.exp(-t / rise_s)) * np.exp(-t / fall_s))
    return out


def scene():
    """Water, pot and hand with their kitchen echo, over high tones and the quiet background."""
    water = drumming() + gurgle() + burble() + spatter() + spray() + big_bubbles()
    landing = knocks() + chatter() + bumps()
    hand = stirring() + squelching() + rubbing() + shoving() + taps()
    pot = landing + hand
    tones = high_tones()
    background = tones + quiet_air()
    # the high tones get the same faint echo as the pot
    echo = kitchen(amp(-20.0) * water + amp(-24.0) * (pot + tones))
    return (water + pot + echo + background)[None]


def record(dry):
    """The microphone sheds deep bass and clips at full scale; then the top of the treble is cut."""
    no_bass = signal.sosfilt(signal.butter(5, 48, "high", fs=SR, output="sos"), dry)
    treble_cut = signal.firwin(511, 15800, window=("kaiser", 9), fs=SR)  # limit in Hz
    return signal.oaconvolve(np.clip(no_bass, -1, 1), treble_cut[None], "same")


dry = scene()
out = record(dry)
materialize(out)
```